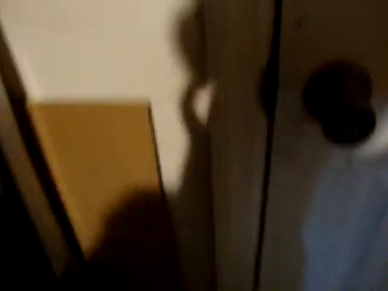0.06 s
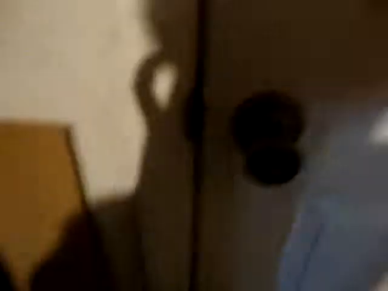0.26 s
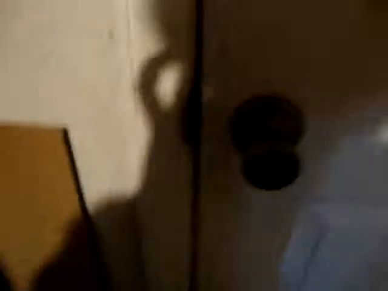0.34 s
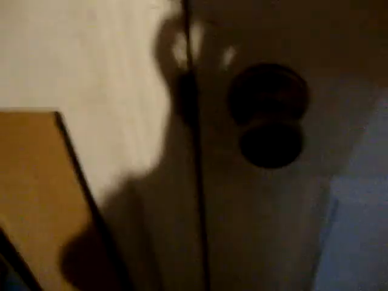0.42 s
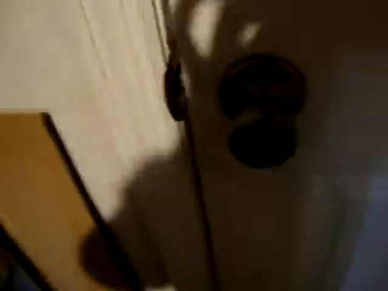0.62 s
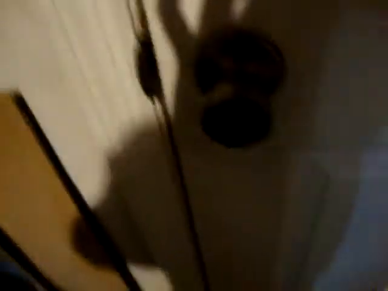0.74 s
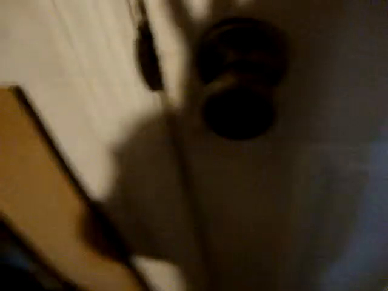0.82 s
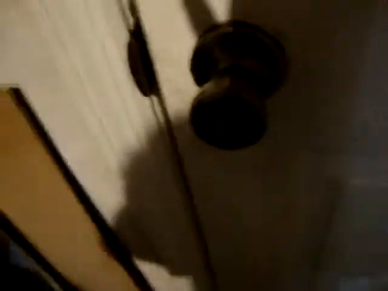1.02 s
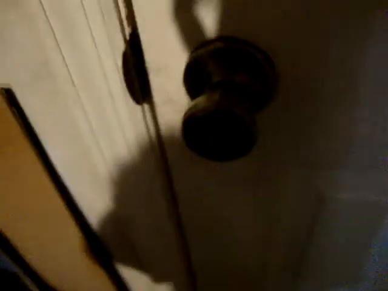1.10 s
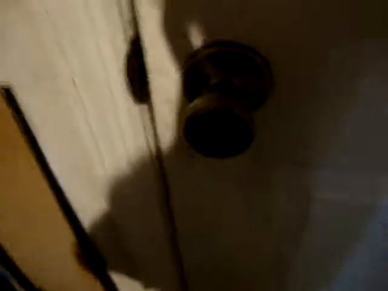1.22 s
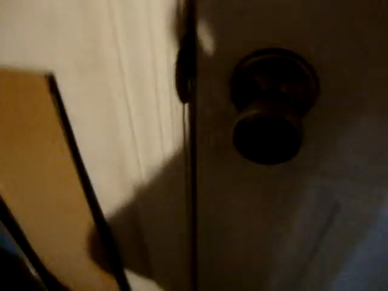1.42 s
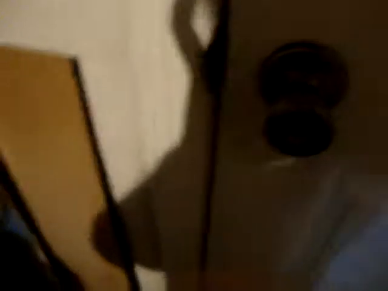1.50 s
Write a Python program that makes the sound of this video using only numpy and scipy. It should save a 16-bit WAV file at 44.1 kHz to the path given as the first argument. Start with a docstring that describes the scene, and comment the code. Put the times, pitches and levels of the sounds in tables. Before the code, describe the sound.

After a faint hand rub and scrape on the knob, a wooden door bangs against its bolt five times about a fifth of a second apart, rebounding and clicking, close-miked in a small indoor space, then quiets.

```python
"""Tugging at a locked door

A locked wooden door is tugged five times by its knob, close by in a small hallway.
Each tug slams the bolt against its plate: noise bursts make the clack, fading tones the ringing panel.
Lesser knocks (two before the first tug, the rest rebounds) and loose metal clicks fill the gaps.
Shaped noise makes the hand's rubbing, one early scrape and a faint hiss.
"""
import sys
import numpy as np
from scipy import signal
from scipy.fft import rfft, irfft
from scipy.io import wavfile
from scipy.ndimage import uniform_filter1d

SR = 44100
rng = np.random.default_rng(int(sys.argv[2]) if len(sys.argv) > 2 else 0)


def unload_wav(signal):
    """Save mono or channel-first audio to the path in sys.argv[1] as 16-bit WAV at rate SR, clipped to [-1, 1]."""
    wavfile.write(
        sys.argv[1],
        SR,
        np.round(np.clip(np.atleast_2d(signal).T, -1, 1) * 32767).astype(np.int16),
    )


N = 68355

# In all tables, t60 is the time to fade by 60 dB, and levels are relative, before further trims.
# The door hits its stop: (time [s], clack level [dB], panel level [dB], brightness [dB per octave],
# favoured pitch [Hz], length of the dip just before [s])
TUG_BLOWS = [(0.2172, -12, -11, -.5, 452, 0.011), (0.4245, -15, -12, 2, 450, .001),
             (0.6439, -16.5, -13.5, 1.5, 287, 0.0047), (0.8647, -19, -15.5, 4, 416, 0.016),
             (1.126, -13, -11.5, 0, 1150, 0.023)]
# Lesser knocks of the door in its frame, two before the first tug, the rest rebounds:
# (time [s], clack level [dB], panel level [dB], brightness [dB per octave], favoured pitch [Hz])
LESSER_KNOCKS = [(.003, -26.5, -39, 0, 1740), (.2035, -23, -58, -7.5, 1480),
                 (.2285, -8.5, -16.5, -1.5, 380), (.2505, -12, -28, -6.5, 1130),
                 (.2635, -13, -35, 2.5, 1380), (.2780, -18, -18.5, 1, 330), (.4335, -13.5, -30, 1.5, 420),
                 (.4445, -13, -21.5, -6, 495), (.4585, -10.5, -44, -0.5, 970), (.4675, -19, -36, 0, 3100),
                 (.4790, -17.5, -29.5, 1, 950), (.6555, -15, -54, -0.5, 750), (.6640, -22, -23.5, -3, 1240),
                 (.6775, -11.5, -15.5, 0.5, 970), (.6890, -8, -58, 18.5, 720),
                 (.7100, -25.5, -24, -0.5, 2300), (.8772, -11, -27, -1.5, 880),
                 (.8850, -19, -21.5, 8.5, 670), (.9000, -9.5, -39, -1.5, 670),
                 (.9200, -19.5, -22.5, 0.5, 1250), (.9915, -30, -38.5, 1, 1100),
                 (1.0325, -34, -48, -2, 1100), (1.1325, -13.5, -23.5, 0.5, 1020),
                 (1.1500, -13, -19, 1, 840), (1.1605, -12, -19, -1, 1980), (1.1785, -20, -45, -1.5, 1090),
                 (1.1925, -58, -24, -8, 1310), (1.2415, -23.5, -48, -1, 2830)]
# The knob and latch click: (time [s], level [dB], brightness [dB per octave], favoured pitch [Hz])
LATCH_CLICKS = [(0.2848, -21.5, -3, 1350), (0.3271, -23.5, -0.5, 1050), (0.3729, -34.5, -5, 1300),
                (.3845, -29.5, -1.5, 1100), (.4030, -34.5, -11, 494), (.4940, -24.5, 3, 800),
                (0.505, -28, -5, 1100), (0.5303, -28, -2.5, 1500), (0.5688, -33, -2.5, 1200),
                (0.5898, -31.5, -1.5, 1245), (.7138, -27, 3.5, 1300), (.7385, -28.5, -2.5, 1000),
                (0.7528, -34.5, 2, 2700), (.7710, -37.5, 0.5, 2700), (0.8046, -37, 0, 2670),
                (.8365, -33.5, 1.5, 2470), (0.9365, -31, -6, 1350), (.9460, -27, -5.5, 2700),
                (0.9572, -33, 1.5, 1070), (0.9755, -28.5, 0, 2760), (1.053, -44, 0.5, 2500),
                (1.089, -47, -1, 2900), (1.2151, -27.5, 0, 1110), (1.2346, -25.5, 2, 2810),
                (1.2885, -36, -1.5, 2700), (1.297, -39, -2, 1000), (1.3231, -43, -1.5, 1730)]
# Ringing tones of the wooden panel: (pitch [Hz], level [dB], t60 before the cap [s])
PANEL_MODES = [(65, -27.5, 0.13), (96.7, -30, 0.29), (138, -22.5, 0.52), (169, -21.5, 0.29),
               (222.4, -10.5, 0.23), (281.5, -10, 0.066), (324, -16, 0.2), (379, -6.5, 0.081),
               (420, -14.5, 0.073), (481.7, -7.5, 0.2), (545, -24, 0.42), (613, -12.5, 0.15),
               (746, -5, 0.073), (848, -13, 0.36)]
# Ringing tones of the knob and latch: (pitch [Hz], level [dB], t60 before the cap [s])
METAL_MODES = [(1026, -19.5, 0.12), (1081.5, -3.5, 0.062), (1154, -7.5, 0.089), (1282, -8, 0.09),
               (1441, -13, 0.17), (1583, -10.5, 0.051), (2000, -20.5, 0.36), (2856, -21.5, 0.12),
               (2946, -13.5, 0.03), (2845, -17.5, 0.17)]
# Cap on how long any struck tone may ring: (pitch [Hz], longest t60 [s])
RING_CAP = [(60, .5), (220, .3), (600, .24), (1200, .2), (3000, .13)]

# Colour of a hard clack: (frequency [Hz], level [dB per Hz])
CLACK_COLOUR = [(40, -41.5), (120, -19.5), (250, -8), (500, -2.5), (800, -3.5), (1200, -2), (1700, -8.5),
                (2400, -10), (3000, -8.5), (3500, -17), (6000, -16.5), (10000, -22.5)]
# Colour of a metal click: (frequency [Hz], level [dB per Hz])
CLICK_COLOUR = [(100, -5), (400, -4), (1100, -1), (1900, 0.5), (2900, 4), (3600, -3), (6000, -2.5),
                (10000, -9.5)]
# Colour of the scraping knob: (frequency [Hz], level [dB per Hz])
SCRAPE_COLOUR = [(100, -25), (600, 6.5), (1300, -18), (2000, 0), (3000, 4.5), (5000, -1.5), (10000, -7.5)]
# Colour of the rubbing hand: (frequency [Hz], level [dB per Hz])
RUB_COLOUR = [(50, -18), (200, -12.5), (550, 1), (850, -7), (1200, -1), (1800, -19), (2800, -12.5),
              (5000, -19.5), (10000, -29.5)]
# Colour of the faint room hiss: (frequency [Hz], level [dB per Hz])
HISS_COLOUR = [(30, -21.5), (100, -4), (250, 2.5), (600, 6), (1200, 2.5), (2000, -2), (5000, -7.5),
               (10000, -11.5)]

# How fast a clack dies away: (frequency [Hz], t60 [s])
CLACK_DECAY = [(150, 0.094), (1000, 0.072), (3000, 0.095), (9000, 0.031)]
# How fast a click dies away: (frequency [Hz], t60 [s])
CLICK_DECAY = [(300, 0.098), (3000, 0.047), (9000, 0.017)]
# How fast one tick of the bolt dies away: (frequency [Hz], t60 [s])
CHATTER_DECAY = [(500, 0.09), (9000, 0.0069)]
# How fast the hallway's tail dies away: (frequency [Hz], t60 [s])
ROOM_DECAY = [(100, 0.44), (500, 0.25), (1500, 0.22), (3000, 0.17), (5000, 0.11), (9000, 0.05)]
# Rubbing of the hand on the knob, before its grain: (time [s], level [dB])
HAND_LEVEL = [(0, -43), (.07, -45), (.16, -39.5), (.22, -53), (.6, -58), (1.1, -63), (1.3, -55),
              (1.42, -86)]

T = np.arange(SR * 4 // 10) / SR  # time inside one short sound, 0.4 s long
HISS_DB = -57

RUB_GRAIN_DB, RUB_GRAIN_S = 1.5, 0.0013  # size of the level flutter, and its smoothing time
SCRAPE_AT_S, SCRAPE_DB = 0.094, -40
SCRAPE_RISE_S, SCRAPE_HOLD_S = 0.016, 0.032  # both counted from the start of the scrape
SCRAPE_FADE_S = 0.0083  # time to fall to 37 percent

FAVOUR_DB, FAVOUR_OCTAVES = 5.5, 0.16  # where a blow lands decides which modes it favours
RING_SPREAD_DB = 1.5  # random variation of the metal tones; the panel gets half
ROOM_DB, ROOM_RISE_S = -8.5, 0.028
CLACK_DB, METAL_IN_CLACK_DB, CLACK_RISE_S = -1.5, -5, 0.0015

PUSH_DB, PUSH_HZ, PUSH_S = 2, 493, .0016  # level above the panel's, pitch, width of the fade

CHATTER_S, CHATTER_DB, CHATTER_SAG_DB_PER_S = .06, -27, -49
CHATTER_SPREAD_DB, CHATTER_TILT_DB = 2.5, 0.5  # random variation, brightness per octave

CLICK_DB, METAL_IN_CLICK_DB, CLICK_RISE_S = 1.5, -14, 0.00075
PING_DB, PING_T60_S = -3.5, 0.037

MIC_LOW_HZ, EDGE_HZ = 67.5, 10100  # the bass and treble limits
DIP_DB, DIP_EDGE_S = -18.5, .003


def amp(db):
    """Turns decibels into gain."""
    return 10 ** (np.asarray(db) / 20)


def unit(x):
    """Scales a sound to an average (rms) strength of 1."""
    return x / np.sqrt(np.mean(x ** 2) + 1e-20)


def read(points, hz):
    """Reads between the rows of a table, along a log-frequency axis."""
    f, value = np.transpose(points)
    return np.interp(np.log(hz + 1), np.log(f), value)


def fade(t60):
    """A steady fade that drops by 60 dB in t60 seconds."""
    return np.exp(-np.log(1000) * T / t60)


def add(mix, s, sound):
    """Mixes a sound in at time s."""
    part = mix[max(round(s * SR), 0):][:len(sound)]
    part += sound[:len(part)]


def noise(colour, size, tilt_db=0):
    """Noise of a given colour and rms 1, tilted by some dB per octave above the bass."""
    hz = np.fft.rfftfreq(size, 1 / SR)
    octaves = np.log2(np.maximum(hz, 500) / 1000)
    strength = amp(read(colour, hz) + tilt_db * octaves)
    random_phase = np.exp(2j * np.pi * rng.random(len(hz)))
    return unit(irfft(strength * random_phase, size))


def hiss():
    """A faint, steady room hiss made of coloured noise."""
    return amp(HISS_DB) * noise(HISS_COLOUR, N)


def knob():
    """Grainy rubbing under the hand, and one brief scrape as the spindle turns."""
    t = np.arange(N) / SR
    smoothing = max(int(RUB_GRAIN_S * SR), 1)
    grain = unit(uniform_filter1d(rng.standard_normal(N), smoothing))
    rub_db = np.interp(t, *np.transpose(HAND_LEVEL)) + RUB_GRAIN_DB * grain
    rub = amp(rub_db) * noise(RUB_COLOUR, N)

    age = t - SCRAPE_AT_S
    rise = np.clip(age / SCRAPE_RISE_S, 0, 1)
    fall = np.exp(-np.maximum(age - SCRAPE_HOLD_S, 0) / SCRAPE_FADE_S)
    return rub + amp(SCRAPE_DB) * rise * fall * noise(SCRAPE_COLOUR, N)


def dying(x, t60):
    """Lets each band of x die away at its own speed."""
    hz, spectrum = np.fft.rfftfreq(len(x), 1 / SR), rfft(x)
    centres, times = np.transpose(t60)
    out = np.zeros(len(x))
    # each row of the identity picks one band, which overlaps its neighbours
    for band, time in zip(np.eye(len(times)), times):
        share = read(np.c_[centres, band], hz)
        out += irfft(spectrum * share, len(x)) * fade(time)
    return out


def favour(hz, centre_hz):
    """Extra dB for the modes near the pitch that a blow favours."""
    return FAVOUR_DB * np.exp(-(np.log2((hz + 1) / centre_hz) / FAVOUR_OCTAVES) ** 2)


def ring(modes, centre_hz, spread_db=0):
    """Struck modes, damped by the hand and the frame; their balance varies with where the blow lands."""
    out = np.zeros(len(T))
    for hz, db, t60 in modes:
        level_db = db + favour(hz, centre_hz) + spread_db * rng.standard_normal()
        out += amp(level_db) * np.cos(2 * np.pi * hz * T) * fade(min(t60, read(RING_CAP, hz)))
    return out


def burst(colour, t60, tilt_db, centre_hz):
    """The crowd of short-lived modes that a hard contact sets off, and its diffuse tail in the hallway."""
    emphasis = amp(favour(np.fft.rfftfreq(len(T), 1 / SR), centre_hz))
    # two separate draws of noise: one for the contact, one for the room
    direct, tail = (irfft(rfft(noise(colour, len(T), tilt_db)) * emphasis, len(T)) for _ in range(2))
    room_rise = 1 - np.exp(-T / ROOM_RISE_S)
    return dying(direct, t60) + amp(ROOM_DB) * dying(tail, ROOM_DECAY) * room_rise


def door():
    """Every blow, tug or lesser knock, gives a hard clack and rings the panel and the lock."""
    out = np.zeros(N)
    attack = np.minimum(T / CLACK_RISE_S, 1)
    blows = [row[:-1] for row in TUG_BLOWS] + list(LESSER_KNOCKS)
    for s, clack_db, panel_db, tilt_db, hz in blows:
        clack = amp(CLACK_DB) * burst(CLACK_COLOUR, CLACK_DECAY, tilt_db, hz)
        clack += amp(METAL_IN_CLACK_DB) * ring(METAL_MODES, hz, RING_SPREAD_DB)
        panel = ring(PANEL_MODES, hz, RING_SPREAD_DB / 2)
        add(out, s, attack * (amp(clack_db) * clack + amp(panel_db) * panel))
    return out


def push():
    """The slab shoves the air once as it is stopped dead: a single swing of pressure."""
    out = np.zeros(N)
    swing = np.sin(2 * np.pi * PUSH_HZ * T) * np.exp(-(T / PUSH_S) ** 2)
    for s, _, panel_db, *_ in TUG_BLOWS:
        add(out, s, amp(panel_db + PUSH_DB) * swing)
    return out


def chatter(count=10):
    """After each tug the bolt chatters on its plate: short noise ticks, uneven in time and level."""
    out = np.zeros(N)
    for s, *_ in TUG_BLOWS:
        places, sizes = rng.random(count), rng.standard_normal(count)
        for k, (place, size) in enumerate(zip(places, sizes)):
            age = CHATTER_S * (k + .5 + place) / count
            tick = dying(noise(CLICK_COLOUR, len(T), CHATTER_TILT_DB), CHATTER_DECAY)
            level_db = CHATTER_DB + CHATTER_SAG_DB_PER_S * age + CHATTER_SPREAD_DB * size
            add(out, s + age, amp(level_db) * tick)
    return out


def latch():
    """Loose metal parts tick between the blows, each with a brief ping at its own pitch."""
    out = np.zeros(N)
    attack = np.minimum(T / CLICK_RISE_S, 1)
    for s, db, tilt_db, hz in LATCH_CLICKS:
        tick = amp(CLICK_DB) * burst(CLICK_COLOUR, CLICK_DECAY, tilt_db, hz)
        tick += amp(METAL_IN_CLICK_DB) * ring(METAL_MODES, hz, RING_SPREAD_DB)
        ping = amp(PING_DB) * np.sin(2 * np.pi * hz * T) * fade(PING_T60_S)
        add(out, s, attack * amp(db) * (tick + ping))
    return out


def scene():
    """Knob, door and latch in the hallway, over a faint room hiss."""
    return (hiss() + knob() + door() + push() + chatter() + latch())[None]


def record(dry):
    """A small microphone thins the bass; the level dips briefly before each tug; the treble is cut off."""
    t = np.arange(N) / SR
    highpass = signal.butter(N=4, Wn=MIC_LOW_HZ, btype="high", fs=SR, output="sos")
    thin = signal.sosfilt(highpass, dry)

    dip = np.zeros(N)  # 0 is no dip, 1 is the full depth
    for s, *_, length in TUG_BLOWS:
        going_down = np.clip((t - s + length) / DIP_EDGE_S, 0, 1)
        coming_back = np.clip((s - t) / DIP_EDGE_S, 0, 1)
        dip += going_down * coming_back

    lowpass = signal.firwin(511, EDGE_HZ, window=("kaiser", 8), fs=SR)
    return signal.oaconvolve(thin * amp(DIP_DB * dip), lowpass[None], "same")


dry = scene()
out = record(dry)
unload_wav(out)
```